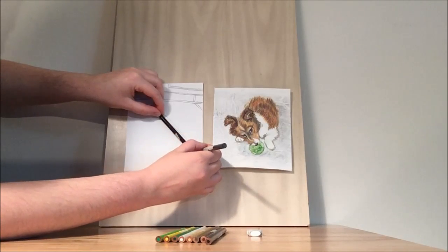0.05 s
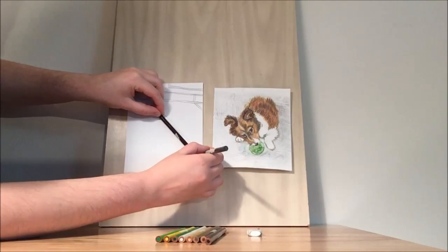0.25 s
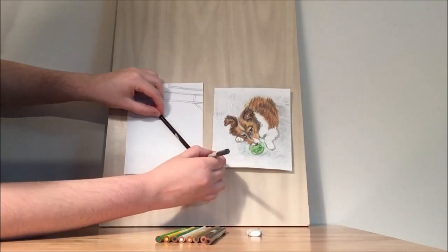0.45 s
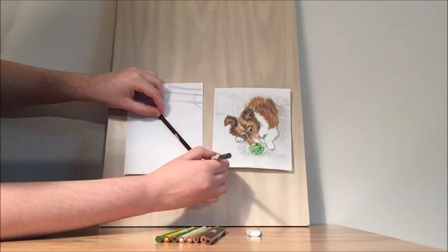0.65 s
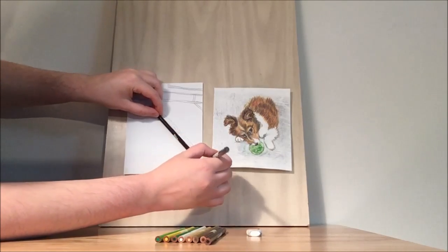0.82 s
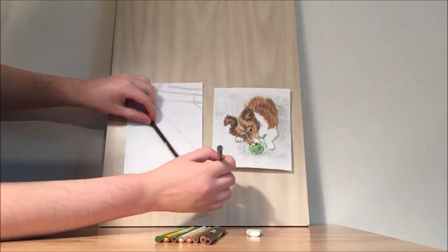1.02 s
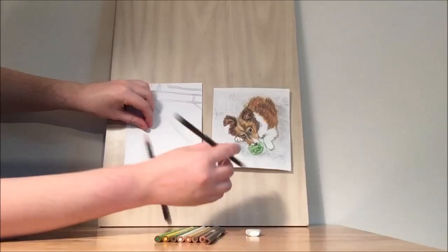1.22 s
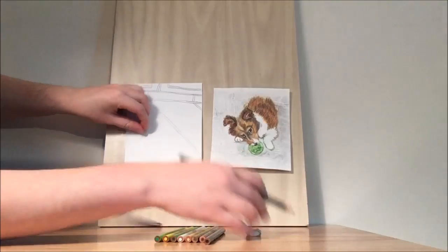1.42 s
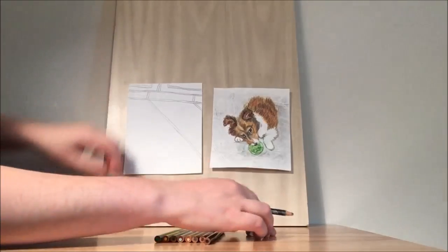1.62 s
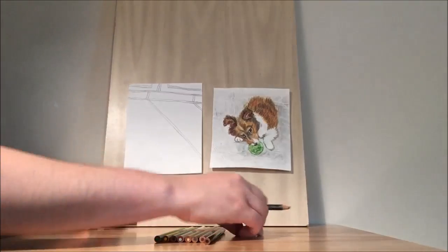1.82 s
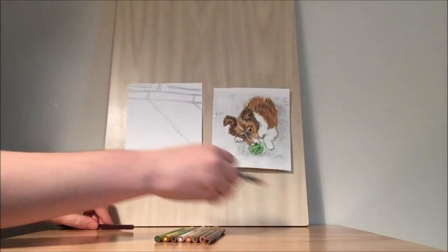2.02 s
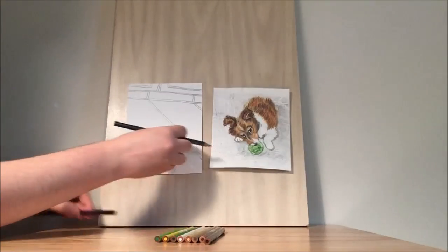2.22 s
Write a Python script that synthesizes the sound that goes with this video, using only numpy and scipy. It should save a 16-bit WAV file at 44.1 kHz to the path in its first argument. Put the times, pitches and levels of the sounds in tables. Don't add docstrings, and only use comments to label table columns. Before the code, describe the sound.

A wooden pencil drops onto a wooden tabletop, bounces, slaps flat, then another clicks down beside pencils

```python
import sys
import numpy as np
from scipy import signal
from scipy.fft import rfft, irfft
from scipy.io import wavfile
from scipy.ndimage import uniform_filter1d

SR = 44100
rng = np.random.default_rng(int(sys.argv[2]) if len(sys.argv) > 2 else 0)


def how_loud(loudness_db):
    steps = np.asarray(loudness_db, float) / 20
    return 10 ** steps


def waveform_to_disk(signal):
    frames = np.transpose(np.atleast_2d(signal))
    scaled = np.clip(frames, -1, 1) * 32767
    samples = np.round(scaled).astype(np.int16)
    wavfile.write(sys.argv[1], SR, samples)


N = 99313
ATTACK_S = 0.00071


def level(x, db):
    return x * how_loud(db) / np.sqrt(np.mean(x ** 2))


def energy_level(x, db):
    return x * how_loud(db) / np.sqrt(np.sum(x ** 2))


def shaped(x, gain):
    return irfft(rfft(x) * gain(np.arange(len(x) // 2 + 1) * SR / len(x) + 1), len(x))


def on_log(points, hz):
    point_hz, value = np.array(points).T
    return np.interp(np.log(hz), np.log(point_hz), value)


def walk(rate):
    k = int(SR / rate)
    steps = np.repeat(rng.standard_normal(N // k + 1), k)
    drift = uniform_filter1d(uniform_filter1d(steps, k), k)[:N]
    return drift / drift.std()


def narrow(hz, width, db):
    noise = rng.standard_normal(N)
    return level(shaped(noise, lambda f: 1 / (1 + (2 * (f - hz) / width) ** 2)), db)


def decay(t, t60):
    return 1000. ** (-t / t60)


def ring(modes, t, chance):
    hz, db, t60 = np.array(modes).T[:, :, None]
    detune, scatter, turn = chance[:, :len(hz), None]
    hz = hz * (1 + .006 * detune)
    gain = how_loud(db + 1.5 * scatter)
    tones = gain * np.sin(2 * np.pi * hz * t + 9 * turn) * decay(t, t60)
    swell = np.sin(np.clip(t / ATTACK_S, 0, 1) * np.pi / 2) ** 2
    return swell * tones.sum(axis=0)


# f/Hz, level/dB, t60/s
TABLE_MODES = [(135, -7, 0.13), (278.8, -8.5, 0.13), (345, -13.5, 0.23), (443.5, -13.5, 0.1),
               (662, -5, 0.036)]


def knocks(hits, modes):
    out, t = np.zeros(N + SR), np.arange(SR // 4) / SR
    crack_hz, crack_t60_s = 5000, 0.023
    for s, db, contact_ms, table_db, crack_db in hits:
        chance, noise = rng.standard_normal((3, 16)), rng.standard_normal(len(t))
        keep = np.exp(-1000 / (max(contact_ms, .005) * SR))
        body = signal.lfilter([1 - keep], [1, -keep], ring(modes, t, chance))
        body = how_loud(db) * body / np.abs(body).max()
        thud = how_loud(table_db) * ring(TABLE_MODES, t, chance[:, ::-1])
        crack = shaped(noise, lambda f: f / crack_hz / (1 + (f / crack_hz) ** 3))
        crack = how_loud(crack_db) * crack * np.minimum(t / ATTACK_S, 1) * decay(t, crack_t60_s)
        i = int(s * SR)
        out[i:i + len(t)] += body + thud + crack
    return out[:N]


# f/Hz, level/dB per Hz
TONE_COLOUR = [(28, -48), (70, -6), (130, -14), (480, -18), (1500, -21), (2200, -29.5), (4500, -40.5),
               (16000, -48.5)]
# f/Hz, width/Hz, level/dB
HUMS = [(327.3, 80, -66.5), (479.5, 22, -73.5), (1570, 75, -76.5), (7900, 60, -92.5)]
# f/Hz, level/dB, wobble/dB
MOTOR = [(48, -68, 1.2), (90, -63, 1.8)]


def room_tone():
    t = np.arange(N) / SR
    drift_db = 0
    air = shaped(rng.standard_normal(N), lambda f: how_loud(on_log(TONE_COLOUR, f)))
    out = level(air, -62.5) * how_loud(drift_db * walk(12))
    out = out + sum(narrow(*hum) for hum in HUMS)
    for hz, db, wobble_db in MOTOR:
        pitch_drift = np.cumsum(2.41 * walk(18.0)) / SR
        tone = level(np.sin(2 * np.pi * (hz * t + pitch_drift)), db)
        out = out + tone * how_loud(wobble_db * walk(8.2))
    return out


# start t/s, attack/s, hold/s, release/s, low edge f/Hz
RUSTLES = [
    (.91, .05, .07, .08, 9500),
    (1.035, .06, .02, .1, 6500),
    (1.222, .012, .05, .12, 9500),
    (1.245, .006, .025, .04, 4200),
    (1.93, .04, .05, .06, 700),
    (1.02, .08, .18, .05, 300),
    (.3, .1, .2, .03, 400),
    (.9, .06, .08, .08, 3000),
    (1.16, .03, .01, .02, 5600),
]
RUSTLE_DB = [-70, -55.5, -65, -52.5, -53.5, -60.5, -73, -75, -69]


def rustle():
    t, out = np.arange(N) / SR, 0
    for (s, attack, hold, release, low_hz), db in zip(RUSTLES, RUSTLE_DB):
        rise = np.clip((t - s) / attack, 0, 1) ** 2
        fall = np.exp(-np.clip(t - s - attack - hold, 0, None) / release)
        high_hz = 2.2 * low_hz
        hiss = shaped(rng.standard_normal(N), lambda f: 1 / (1 + (low_hz / f) ** 6) / (1 + (f / high_hz) ** 3))
        out = out + rise * fall * level(hiss, db) * how_loud(2 * walk(30))
    return out


# f/Hz, level/dB, t60/s
BOARD_MODES = [(465, -11, 0.14), (692, -9.5, 0.05), (1330, -9.5, 0.038), (1617, 3, 0.046),
               (2724, -43, 0.013), (3860, -34, 0.02)]
# t/s, level/dB, contact/ms, tabletop level/dB, crack level/dB
BOARD_HITS = [
    (.5975, -39.5, .1, -66, -54),
    (.6005, -33.5, 0.27, -68, -57),
    (.632, -47, 0.47, -67, -80),
]


def board_taps():
    return knocks(BOARD_HITS, BOARD_MODES)


# f/Hz, t60/s
ROOM_T60 = [(150, 1), (400, 0.76), (1000, 0.67), (3000, 0.69), (6000, 0.47), (10000, 0.67), (13000, 0.08),
            (16000, 0.41)]


def room(x):
    t, tail = np.arange(SR) / SR, 0
    noise, early = rng.standard_normal((2, SR))
    for hz in 60 * 2 ** np.arange(0, 8.3, .5):
        band = shaped(noise, lambda f: np.cos(np.clip(np.log2(f / hz) * 2, -1, 1) * np.pi / 2) ** 2)
        tail = tail + band * decay(t, on_log(ROOM_T60, hz))
    tail = tail * (1 - np.exp(-t / 0.0026))
    early = early * decay(t, 0.039)
    return signal.fftconvolve(x, energy_level(tail, -3.5) + energy_level(early, -7))[:N]


# f/Hz, level/dB, t60/s
ARM_MODES = [(140, 0, .09), (210, -5, .07), (400, -8, .05), (800, -12, .03)]
# t/s, level/dB, contact/ms, tabletop level/dB, crack level/dB
ARM_HITS = [
    (.878, -53, .3, -61.5, -82),
    (.905, -55.5, .5, -49, -77),
    (1.25, -51.5, .5, -65, -92),
    (1.555, -48.5, 0.72, -57.5, -70.5),
]


def arm_bumps():
    return knocks(ARM_HITS, ARM_MODES)


# f/Hz, width/Hz, level/dB, landing t/s
SKID = [
    (1710, 290, -38, 1.2968),
    (2650, 200, -41, 1.2968),
    (1850, 400, -38, 1.537),
]


def skid():
    t, out = np.arange(N) / SR, 0
    for hz, width, db, landing_s in SKID:
        growth = np.exp(-np.abs(landing_s - t) / .007) * (t < landing_s)
        out = out + narrow(hz, width, db) * growth
    return out


# f/Hz, level/dB, t60/s
END_MODES = [(713, -11, 0.012), (930, -9.5, 0.03), (1400, -24.5, 0.017), (1298, 4.5, 0.01),
             (1704, -2, 0.019), (2114, -5, 0.039), (2520, -2.5, 0.015), (2886, -8.5, 0.021),
             (3770, -1.5, 0.01), (4430, -4, 0.016), (5100, -7, .005), (5876, -8, 0.02),
             (9100, -38.5, 0.013), (12380, -44.5, 0.018)]
# t/s, level/dB, contact/ms, tabletop level/dB, crack level/dB
END_HITS = [
    (1.2968, -10, 0.043, -38.5, -25),
    (1.2995, -11.5, 0.13, -42.5, -31),
    (1.3025, -12, 0.19, -45, -39),
    (1.3062, -20.5, 0.16, -53.5, -38.5),
    (1.4045, -21, 0.15, -49.5, -42),
    (1.465, -32.5, .05, -42.5, -47),
]


def end_landing():
    return knocks(END_HITS, END_MODES)


# f/Hz, level/dB, t60/s
KNOCK_MODES = [(387, -22, 0.049), (672, -6, 0.055), (2088, -1, 0.025), (2520, -6.5, 0.012),
               (2750, -7, 0.031), (3280, -3.5, 0.011), (4440, -8, .009), (5420, -14, 0.0067)]
# t/s, level/dB, contact/ms, tabletop level/dB, crack level/dB
KNOCK_HITS = [
    (1.2972, -14, 0.02, -51, -50),
    (1.2995, -17, 0.035, -53, -48.5),
]


def bending_knock():
    return knocks(KNOCK_HITS, KNOCK_MODES)


# f/Hz, level/dB, t60/s
BOUNCE_MODES = [(642, -15, 0.088), (1173, -13, 0.051), (1398, -11, 0.033), (2060, -9, .03),
                (3268, -15, 0.022), (4260, -17.5, .015), (8950, -26.5, .012)]
# t/s, level/dB, contact/ms, tabletop level/dB, crack level/dB
BOUNCE_HITS = [
    (1.405, -21, 0.063, -47, -30),
]


def middle_bounce():
    return knocks(BOUNCE_HITS, BOUNCE_MODES)


# f/Hz, level/dB, t60/s
TIP_MODES = [(1800, -22, .01), (5800, -20, .012), (8840, -3, .012), (9115, 0, .014), (12190, -16, .012),
             (12700, -13, .012), (15200, -20, .006)]
# t/s, level/dB, contact/ms, tabletop level/dB, crack level/dB
TIP_HITS = [(1.515, -51, .01, -78.5, -64), (1.5262, -58.5, .01, -80, -64),
            (1.5378, -10.5, 0.0091, -80.5, -38), (1.5472, -17, 0.0091, -46.5, -24),
            (1.5565, -27, .01, -64, -37), (1.5632, -18.5, .01, -66.5, -37.5),
            (1.5672, -21.5, .01, -70, -37.5), (1.5718, -21, .01, -61, -27), (1.5775, -23, .01, -69.5, -46),
            (1.585, -32, .01, -67, -35), (1.701, -44, .01, -83, -55)]


def tip_chatter():
    return knocks(TIP_HITS, TIP_MODES)


# f/Hz, level/dB, t60/s
FLAT_MODES = [(647, -50, 0.017), (1266, -13, 0.014), (1760, -5, 0.0083), (2240, -15, 0.0025),
              (3270, -9.5, 0.004), (4110, -21.5, 0.0082), (5780, -15.5, 0.019), (6430, -18, 0.0099),
              (7480, -22, 0.013), (8820, -3.5, 0.0075), (11160, -12.5, 0.004), (12030, -9, 0.0093),
              (13020, -7, 0.011), (14600, -3, .003)]
# t/s, level/dB, contact/ms, tabletop level/dB, crack level/dB
FLAT_HITS = [
    (1.537, -11.5, 0.014, -29, -6),
    (1.5392, -9.5, 0.068, -39.5, -32),
]


def flat_slap():
    return knocks(FLAT_HITS, FLAT_MODES)


# f/Hz, level/dB, t60/s
ROW_MODES = [(500, -31, 0.018), (830, -18, 0.019), (1300, -10.5, 0.0067), (1733, -7.5, 0.01),
             (2140, -2, 0.0086), (2867, -0.5, 0.0059), (3607, -2, 0.0064), (4300, 0, 0.0053),
             (5720, -2, 0.0057), (6480, 3, 0.0036), (8120, -2.5, 0.0029), (8970, -13.5, 0.014),
             (12450, -24, 0.024)]
# t/s, level/dB, contact/ms, tabletop level/dB, crack level/dB
ROW_HITS = [(1.7082, -13.5, 0.02, -35, -20.5), (1.7105, -8.5, 0.027, -37, -19),
            (1.713, -18.5, 0.087, -33.5, -47), (1.7165, -23, 0.081, -35, -48),
            (1.7385, -25, 0.11, -44, -51), (1.760, -26, .05, -51, -50), (1.8238, -22, 0.053, -36.5, -45),
            (1.8291, -21.5, 0.2, -34, -56), (1.850, -32.5, 0.23, -37, -52), (1.9045, -24, 0.1, -40.5, -54),
            (1.907, -24, 0.017, -38, -34.5), (1.909, -24.5, 0.13, -40, -23), (1.934, -39, 0.19, -34.5, -55),
            (1.951, -30, 0.17, -47, -61), (1.984, -30, 0.22, -46, -54.5)]


def row_clicks():
    return knocks(ROW_HITS, ROW_MODES)


def scene():
    pencil = end_landing() + middle_bounce() + flat_slap() + row_clicks()
    knock = bending_knock()
    low_cut = signal.butter(3, 278, "high", fs=SR, output="sos")
    near = signal.sosfilt(low_cut, pencil) + arm_bumps()
    board, tip = board_taps(), tip_chatter()
    room_send = near + how_loud(-4.5) * knock + how_loud(-24) * board + how_loud(-6) * tip
    direct = near + board + tip + knock
    return (direct + room(room_send) + skid() + rustle() + room_tone())[None]


# from t/s, to t/s, top f/Hz
BANDWIDTH = [(0, 1.293, 15900), (1.305, 1.533, 15900), (1.543, 1.704, 15900), (1.712, 1.8, 15900),
             (1.72, 1.815, 13400), (1.8, 2.3, 15800), (1.835, 1.9, 13600), (1.915, 2.0, 13700)]


def narrowed(x):
    t = np.arange(N) / SR
    for start, end, top_hz in BANDWIDTH:
        inside = 1. * ((t >= start) & (t < end))
        gate = uniform_filter1d(inside, size=300, mode="nearest")
        x = x - gate * shaped(x, lambda f: f > top_hz)
    return x


def band_limit(x):
    return signal.sosfilt(signal.butter(12, 17110, fs=SR, output="sos"), x)


def record(dry):
    top_cut = signal.ellip(8, .5, 60, 16900, fs=SR, output="sos")
    mix = signal.sosfilt(top_cut, narrowed(dry[0])[None])
    return band_limit(mix)


dry = scene()
out = record(dry)
waveform_to_disk(out)
```